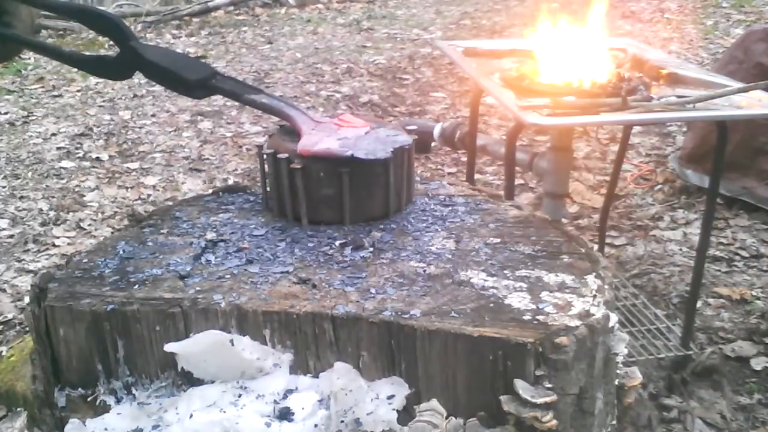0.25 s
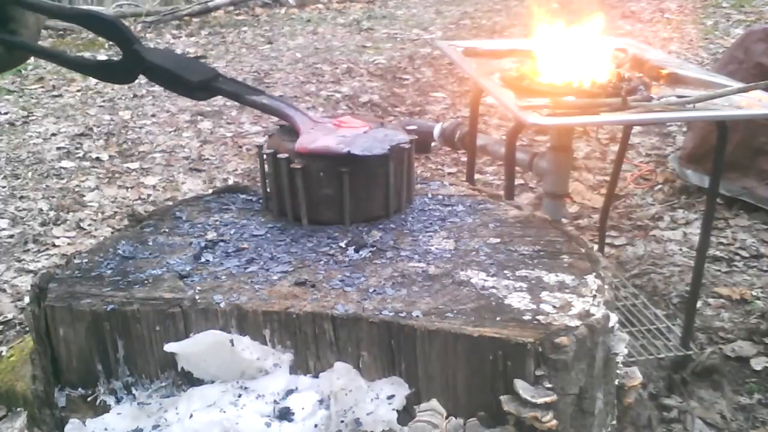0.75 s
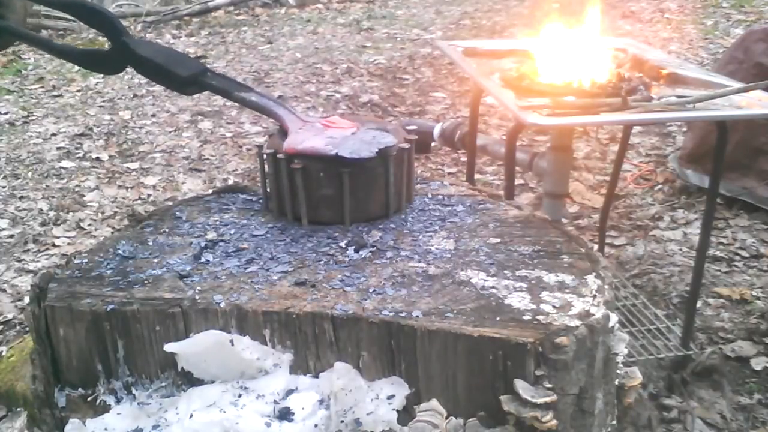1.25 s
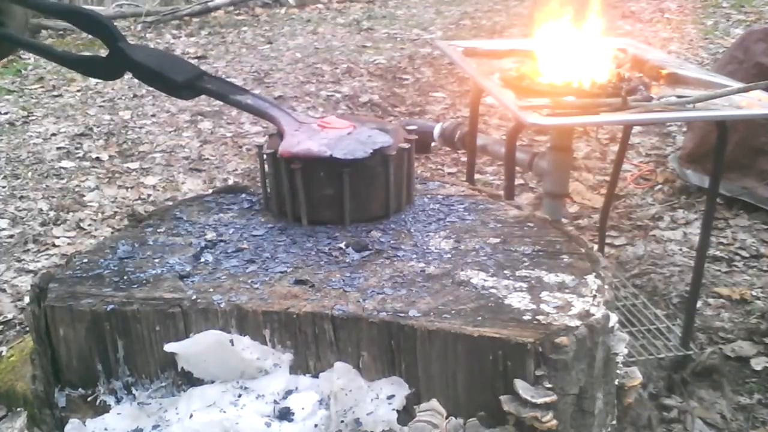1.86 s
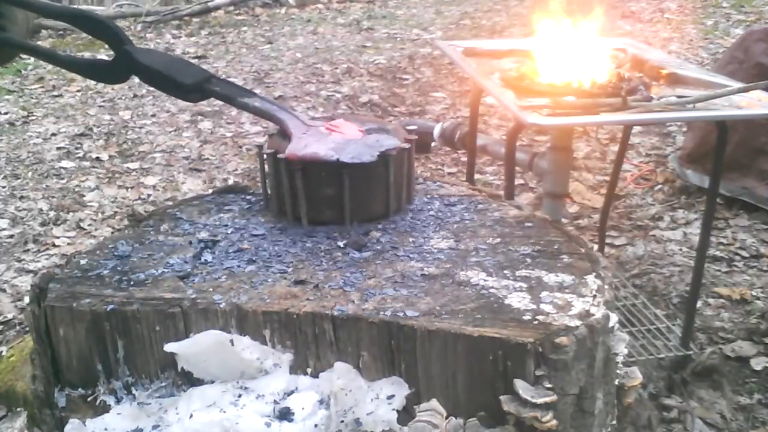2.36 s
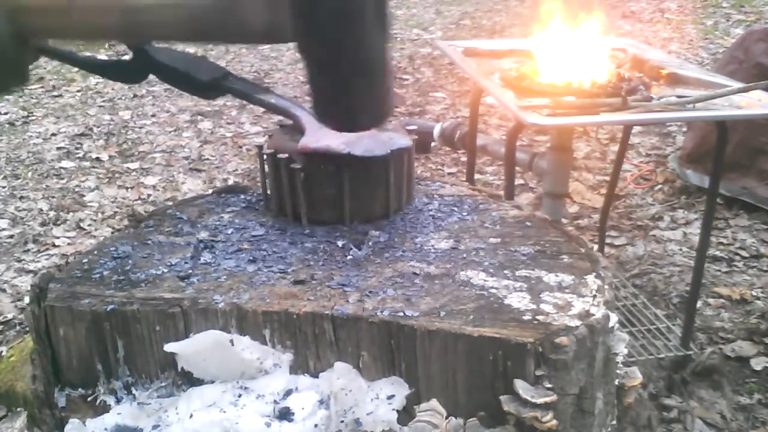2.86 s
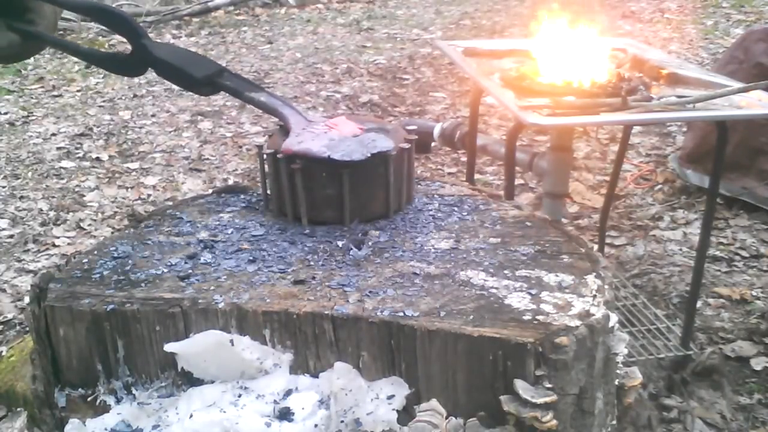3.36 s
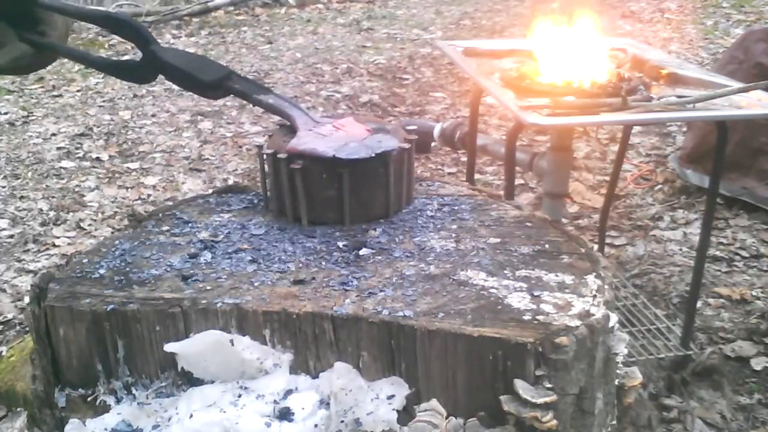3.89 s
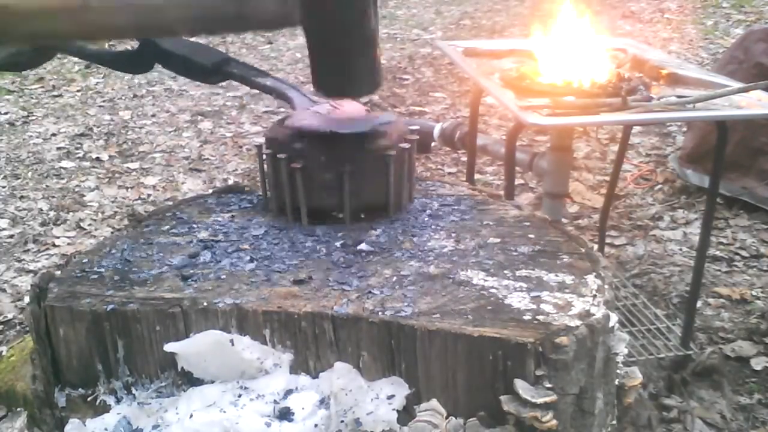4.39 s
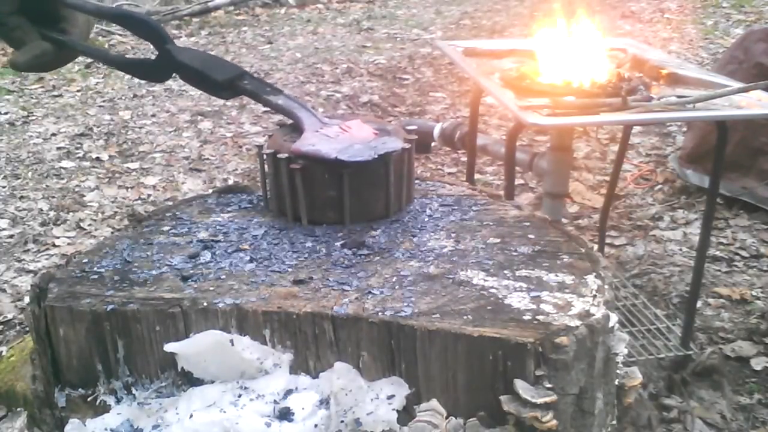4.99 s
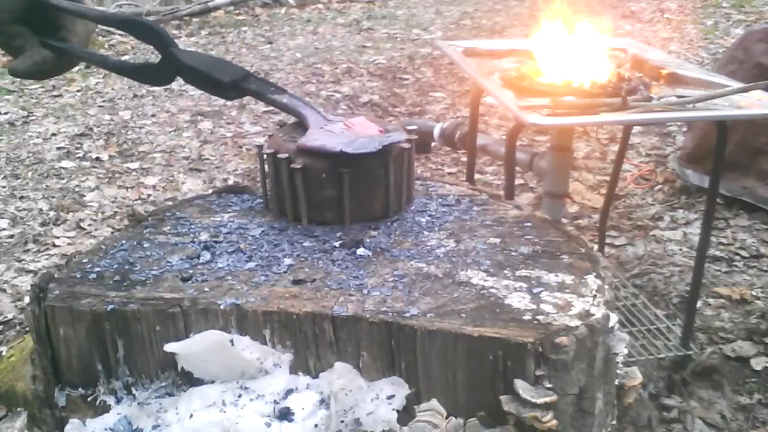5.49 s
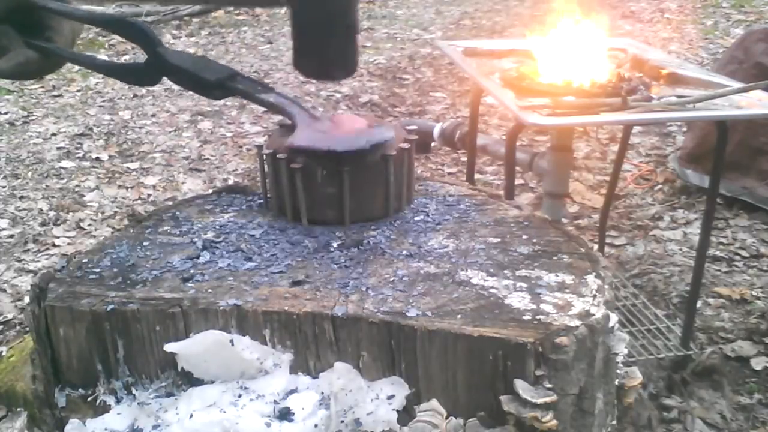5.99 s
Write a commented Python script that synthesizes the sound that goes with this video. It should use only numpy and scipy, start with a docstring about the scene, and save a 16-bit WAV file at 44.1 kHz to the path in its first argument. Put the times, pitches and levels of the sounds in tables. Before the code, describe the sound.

Outdoors among trees, a small forge gives a soft, uneven roar with faint charcoal ticks. Right at the microphone, a hammer hits hot steel on an anvil eight times at an even pace, slightly overloading it. Dull, crunchy knocks turn into short, bright clangs with a growing echo, most trailed by a very high ring and a quick rattle of the bouncing steel. There is one faint scrape halfway, and low thuds follow the later blows.

```python
"""A small anvil on a tree stump in the woods, the microphone so close that every blow overloads it.
At first the hand hammer sinks dully into glowing steel and the work bounces in the tongs, while
behind the anvil a small forge roars softly and its charcoal ticks. About three seconds in, the work
is dragged over the anvil. As the steel cools and thins the blows clang harder and the woods answer
louder; after most of them the hammer head sings on, sinking in pitch as it is swung back up."""
import sys
import numpy as np
from scipy import signal
from scipy.fft import rfft, irfft, next_fast_len
from scipy.io import wavfile

SR = 44100
rng = np.random.default_rng(int(sys.argv[2]) if len(sys.argv) > 2 else 0)


def wrap_up_sound(samples):
    """Save the sound to the file named by the first command line argument, as 16-bit audio."""
    columns = np.atleast_2d(samples).T
    # keep every value between -1 and 1, then stretch to whole-number steps
    tamed = np.clip(columns, -1, 1)
    steps = np.round(tamed * 32767).astype(np.int16)
    wavfile.write(sys.argv[1], SR, steps)


N = 275184
T = np.arange(SR * 3 // 4) / SR  # seconds since a contact

# The blows; levels in all tables are relative. Each row: start in seconds, force in dB, hammer ring
# in dB, first flight of the work in seconds, bounce in dB, loss per bounce in dB, far-edge knock in Hz.
BLOWS = [(-0.08, 2.5, -2.5, 0.078, -10, 12, 420), (0.589, -1.5, -27, 0.049, -15, 5, 580),
         (1.3512, -0.5, -10, .058, -18, -3, 1190), (2.0977, -1, -3, 0.061, -18, 4.5, 1200),
         (2.856, 0.5, -1, 0.055, -12, 8, 1200), (3.6414, -1, 3.5, 0.06, -20.5, 3, 506),
         (4.4158, 0.5, 1.5, .052, -13, 2.5, 428), (5.2091, 0.5, 3.5, 0.045, -18.5, 0.5, 335),
         (6.0057, -1, -13.5, .061, -10.5, 8, 470)]
# What a blow rings, close up. Each row: pitch in Hz, level in dB, time to fade 60 dB in seconds.
STUMP_MODES = [(101, -23.5, 0.3), (148.3, -17.5, 0.14), (246.8, -9.5, 0.11), (296.3, -7, 0.076),
               (384.4, -3.5, 0.079), (475.5, -6.5, 0.11), (568, 2, 0.053), (650.3, 6, 0.041)]  # the anvil seated in the stump
ANVIL_MODES = [(829.4, -0.5, 0.056), (929, 2.5, 0.048), (997, 6, 0.041), (1102, 4, 0.039), (1310, 5, 0.02),
               (1410, 5, 0.023)]  # the block, damped by soft hot steel
WORK_MODES = [(1804, -1.5, 0.046), (1896, -2, 0.046), (1996, -1.5, 0.067), (2094, -2, 0.057),
              (2205, -26, 0.16), (2530, -44, 0.21), (2740, -15.5, 0.093), (3090, -8.5, 0.068),
              (3137, -10, 0.11), (3297, 2.5, 0.029), (3410, -10, 0.079), (3540, -14.5, 0.102),
              (3565, -14.5, 0.091), (4340, -18, 0.029), (5013, -1, 0.031), (5340, 3, 0.021)]  # the work and the tongs that grip it
PING_MODE = [(14125, -16, .15)]  # the anvil's highest overtone
# The hammer head. Each row: pitch in Hz, level in dB, 60 dB fade in seconds, left over right in dB.
HAMMER_MODES = [(10085, -24, .25, 2), (10980, -11, .45, 4), (12400, -28, .18, -2)]
# Noise colours. Each row: frequency in Hz, spectral level in dB.
CRACK_COLOUR = [(200, -24), (600, -25), (1050, 3), (2000, -2.5), (4000, -5), (8000, -29.5), (14000, -28.5)]  # first contact
CRUSH_COLOUR = [(30, -25), (100, -14.5), (250, -3.5), (600, 7.5), (1200, 0), (1600, -9.5), (3200, -2.5),
                (4500, -9), (8000, -16), (13000, -14), (15500, -30)]  # scale crushed under the hammer
WOODS_COLOUR = [(50, -28), (120, -2.5), (500, 3), (1000, 1.5), (1500, -4), (2100, 0), (2700, -4.5),
                (3400, -0.5), (5000, -6), (7500, -8.5), (10000, -20), (14000, -54)]  # the echo from the trees
GRIT_COLOUR = [(300, -22), (1000, 11.5), (2000, 4), (4500, 6), (7000, -7), (9000, -13.5), (14000, -20)]  # scaly steel on the anvil
FORGE_COLOUR = [(15, -79), (25, -40), (111, -3.5), (157, -6.5), (175, -6), (322, -1), (455, -1),
                (493, -2.5), (934, -4), (1130, -14.5), (1290, -10), (1970, -15), (2710, -20), (6880, -28.5),
                (14500, -32.5)]  # the fire
# How crushed scale and the echo die away. Each row: frequency in Hz, 60 dB fade in seconds.
CRUSH_T60 = [(60, 0.26), (400, 0.078), (1200, 0.1), (3500, 0.12), (8000, 0.11), (14000, 0.083)]
WOODS_T60 = [(100, 0.74), (500, 0.86), (2000, 0.94), (4000, 0.75), (8000, 0.48), (14000, 0.21)]
# Stereo image at the anvil, farther off and at the forge. Each row: frequency in Hz, left-right likeness.
NEAR_ALIKE = [(100, 0.93), (500, 0.63), (1000, 0.26), (2000, 0.53), (4000, 0.076), (12000, 0.6)]
FAR_ALIKE = [(130, 0.85), (300, 0.9), (640, 0.16), (1400, -0.2), (12000, 0.076)]
FORGE_ALIKE = [(60, 0.97), (130, 0.94), (290, 0.88), (640, 0.87), (1410, 0.3), (3100, 0.062), (6810, -0.15),
               (15000, -0.011)]
# The air feed's hollow whistle. Each row: pitch in Hz, half-width in Hz, level in dB.
AIR_FEED = [(514, 5.9, -52.5), (1097, 22, -52.5)]
# The stump rocking back on the ground. Each row: start in seconds, level in dB.
THUDS = [(0.008, -17), (3.757, -22.5), (4.501, -16), (5.278, -20), (6.134, -18)]
# The clearest charcoal ticks. Each row: start in seconds, level in dB.
CLEAR_TICKS = [(0.1369, -30.5), (0.265, -28), (0.93, -31), (1.2032, -24), (1.9037, -35.5), (2.733, -36),
               (3.3866, -37), (3.9614, -40), (4.3049, -19), (4.3178, -29), (4.339, -35), (5.1534, -31),
               (5.6736, -38), (5.8356, -30)]
# The work dragged over the anvil. Each row: time in seconds, level in dB.
SLIDE_LEVELS = [(2.97, -66), (3.04, -46), (3.08, -39), (3.145, -42), (3.165, -68)]
# The microphone's two ports. Each row: frequency in Hz, left over right in dB.
PORT_BALANCE = [(400, 0), (700, -1.5), (1100, -0.5), (2200, 3), (3300, 3.5), (5000, -4), (7500, -4.5),
                (10000, 2), (13000, -3.5)]

# How each part follows the steel. Each law: level in dB, change while soft in dB, drift in dB a second.
STUMP_LAW, ANVIL_LAW, WORK_LAW = (-0.84, 2.4, -0.48), (2.6, -18.5, -0.12), (-4, 0, 1.36)
CRUSH_LAW, ECHO_LAW, CLACK_LAW = (2.8, -4.5, 0), (-24.5, -4.5, 0.76), (-8.5, -7.5, 0.96)


def amp(db):
    """Decibels to gain."""
    return 10 ** (np.asarray(db) / 20)


def unit(x):
    """x at rms 1."""
    return x / np.sqrt(np.mean(x ** 2) + 1e-20)


def along(points, hz):
    """(Hz, value) points read on a log axis."""
    knots_hz, values = np.transpose(points)
    return np.interp(np.log(hz + 1), np.log(knots_hz), values)


def wobble(rate, size):
    """A smooth random curve, rate knots a second."""
    step = int(SR / rate)
    return signal.resample_poly(rng.standard_normal(size // step + 8), step, 1)[4 * step:][:size]


def add(track, s, sound):
    """Mix a stereo sound into the track at s seconds."""
    start = round(s * SR)
    part = sound[:, max(-start, 0):N - start]
    track[:, max(start, 0):][:, :part.shape[1]] += part


def filtered(x, gain):
    """x times a gain that depends on frequency."""
    size = next_fast_len(N + SR // 4)
    return irfft(rfft(x, size) * gain(np.fft.rfftfreq(size, 1 / SR)), size)[..., :N]


def noise(colour, alike, size=len(T)):
    """Stereo noise of rms 1 with a given colour and left-right likeness."""
    hz = np.fft.rfftfreq(size, 1 / SR)
    turn = np.arccos(np.clip(along(alike, hz), -1, 1)) / 2
    spectra = rfft(rng.standard_normal((2, size))) * amp(along(colour, hz))
    mid, side = irfft(spectra * [np.cos(turn), np.sin(turn)], size)
    return unit(np.array([mid + side, mid - side]))


def dying(x, t60s):
    """Each frequency of x fades at its own speed."""
    hz, t, spectra = signal.stft(x, SR, nperseg=256)
    fade = amp(-60 * t / along(t60s, hz)[:, None])
    return signal.istft(spectra * fade, SR, nperseg=256)[1][:, :len(T)]


def rise(seconds):
    """A soft start."""
    return 1 - np.exp(-T / seconds)


def steel_gain(law, s, half_soft_s=1.24, firming=4.4):
    """Gain of one part of a blow at s seconds: soft steel cushions it, then the work thins steadily."""
    db, soft_db, db_per_s = law
    softness = 1 / (1 + (max(s, 0) / half_soft_s) ** firming)
    return amp(db + soft_db * softness + db_per_s * s)


def ring(modes, scatter_db, detune):
    """Modes struck afresh, each reaching left and right with its own phase gap."""
    out, t = np.zeros((2, len(T))), T[:SR // 4]
    for hz, db, t60 in modes:
        strength, shift, side = rng.standard_normal(3)
        apart = np.sign(side) * np.arccos(np.clip(along(NEAR_ALIKE, hz), -1, 1)) / 2
        phase = 2 * np.pi * (hz * (1 + detune * shift) * t + rng.random())
        envelope = amp(db + scatter_db * strength - 60 * t / t60)
        out[:, :len(t)] += envelope * np.sin(phase + [[apart], [-apart]])
    return out


def hammering(stump_lag_s=0.001994):
    """Right at the microphone each blow cracks, crushes scale, rings the steel, then shakes the stump."""
    out = np.zeros((2, N))
    for s, force_db, song_db, *_ in BLOWS:
        stump = steel_gain(STUMP_LAW, s) * ring(STUMP_MODES, scatter_db=0, detune=0.02) * rise(0.003)
        anvil = steel_gain(ANVIL_LAW, s) * ring(ANVIL_MODES, scatter_db=1.3, detune=0.0051)
        work = steel_gain(WORK_LAW, s) * ring(WORK_MODES, scatter_db=3, detune=0.0051)
        crack = steel_gain(CRUSH_LAW, s) * amp(13 - 60 * T / 0.015) * noise(CRACK_COLOUR, NEAR_ALIKE)
        crush = steel_gain(CRUSH_LAW, s) * dying(noise(CRUSH_COLOUR, NEAR_ALIKE), CRUSH_T60)
        echo = steel_gain(ECHO_LAW, s) * woods(work, clang_db=-14)
        # the ping meets the two ports out of step
        ping = amp(2) * ring(PING_MODE, scatter_db=2, detune=0.001) * [[1], [-1]]
        add(out, s, amp(force_db) * (anvil + work + ping + crack + crush + echo))
        add(out, s + stump_lag_s, amp(force_db) * stump)
        add(out, s, amp(song_db) * hammer_song(away_s=0.3))
    return out


def hammer_song(away_s):
    """The head rings as it speeds up and away from the microphone: the pitch sinks, then the tone fades."""
    t = T[:SR // 2]
    lift = 12 + rng.standard_normal()  # m/s2
    delay_s = lift * t ** 2 / 2 / 343  # distance over the speed of sound
    out = np.zeros((2, len(t)))
    for hz, db, t60, pan_db in HAMMER_MODES:
        # reflections from stump and ground slip in and out of step as the head gathers speed
        waver_db = np.minimum(1.5 + 14 * t, 4) * np.array([wobble(70, len(t)) for side in range(2)])
        phase = 2 * np.pi * (hz * (t - delay_s) + rng.random()) + np.array([[0], [2]])
        sides_db = np.array([[pan_db], [-pan_db]]) / 2
        out += amp(db - 60 * t / t60 + waver_db + sides_db) * np.sin(phase)
    return out / (1 + (t / away_s) ** 12)


def woods(clang, clang_db):
    """From farther off the trees return a blow trunk by trunk, a wash that keeps the clang's pitch."""
    trunks = amp(1.2 * wobble(67.1, len(T))) * rise(0.0074)
    wash = dying(noise(WOODS_COLOUR, FAR_ALIKE), WOODS_T60) * trunks
    pitched = signal.fftconvolve(wash, clang / np.linalg.norm(clang[0]), axes=1)[:, :len(T)]
    return wash + amp(clang_db) * pitched


def knock(hz, t60):
    """One dull, quickly damped note, dead centre."""
    return np.tile(np.sin(2 * np.pi * hz * T) * amp(-60 * T / t60) * rise(0.0016), (2, 1))


def bouncing(count, flight_ratio=0.44, near_edge_hz=480, detune=0.04, clack_t60=0.035):
    """The work jumps after a blow and lands edge after edge, ever sooner, with a knock and a clack."""
    out = np.zeros((2, N))
    for s, _, _, flight_s, bounce_db, loss_db, far_edge_hz in BLOWS:
        landings = s + np.cumsum(flight_s * flight_ratio ** np.arange(count))
        for k, landing in enumerate(landings):
            edge_hz = far_edge_hz if k % 2 else near_edge_hz
            dull = knock(edge_hz * np.exp(detune * rng.standard_normal()), t60=0.031)
            clack = steel_gain(CLACK_LAW, s) * amp(-60 * T / clack_t60) * noise(GRIT_COLOUR, NEAR_ALIKE)
            add(out, landing, amp(bounce_db - k * loss_db) * (dull + clack))
    return out


def forge():
    """Behind the anvil, the fire's soft uneven roar and the narrow resonances of its air feed."""
    roar = noise(FORGE_COLOUR, FORGE_ALIKE, N)
    roar *= amp(-41.5 + 0.41 * wobble(4.17, N) + 1.08 * wobble(6.8, N))
    for hz, half_width_hz, db in AIR_FEED:
        whistle = filtered(rng.standard_normal(N), lambda f: 1 / (1 + ((f - hz) / half_width_hz) ** 2))
        roar += amp(db) * unit(whistle)
    return roar


def stump_settling():
    """After some blows the stump drops back on the ground with a low thud."""
    out = np.zeros((2, N))
    for s, db in THUDS:
        add(out, s, amp(db) * knock(hz=141, t60=0.054))
    return out


def charcoal(faint_count, faint_db=-49, faint_range_db=3.5, top_hz=9000, octave_down_db=-27.5, t60=0.011):
    """Back in the fire, a few clear ticks among many faint ones; the bigger the tick, the lower."""
    out, t = np.zeros((2, N)), T[:SR // 16]
    faint_ticks = rng.random((faint_count, 2)) * [N / SR, faint_range_db] + [0, faint_db]
    for s, db in [*CLEAR_TICKS, *faint_ticks]:
        hz = top_hz / (1 + amp(db - octave_down_db))
        colour = [(hz / 3, -28), (hz / 1.3, -5), (hz, 0), (hz * 1.4, -9), (hz * 4, -26)]
        envelope = amp(db - 0.5 - 60 * t / t60) * rise(0.00057)[:len(t)]
        add(out, s, envelope * noise(colour, FAR_ALIKE, len(t)))
    return out


def sliding():
    """Close up, scale grinds under the work as the tongs shift it."""
    level_db = np.interp(np.arange(N) / SR, *np.transpose(SLIDE_LEVELS), left=-np.inf, right=-np.inf)
    return amp(level_db + 1.9 * wobble(300, N)) * noise(GRIT_COLOUR, NEAR_ALIKE, N)


def scene():
    """The anvil close by, the forge behind it, the woods around."""
    return hammering() + bouncing(count=3) + forge() + stump_settling() + charcoal(faint_count=40) + sliding()


def record(dry):
    """Each microphone port has its own colour; every blow clips the input; the top treble is cut."""
    heard = filtered(dry, lambda hz: amp(np.outer([1, -1], along(PORT_BALANCE, hz)) / 2))
    clipped = np.clip(heard, -0.97, 0.97)
    band_limit_hz = 14800
    return filtered(clipped, lambda hz: 1 / (1 + (hz / band_limit_hz) ** 70))


dry = scene()
out = record(dry)
wrap_up_sound(out)
```